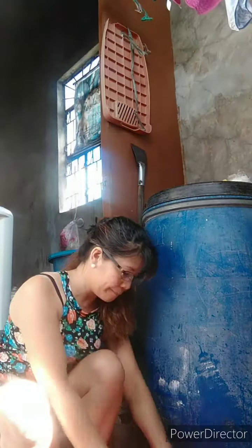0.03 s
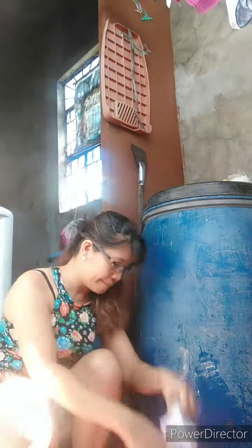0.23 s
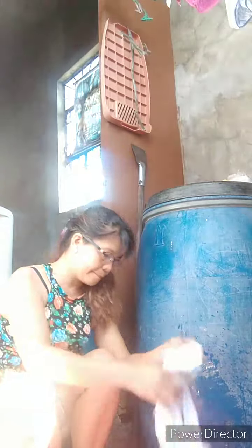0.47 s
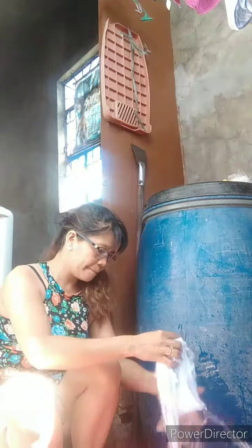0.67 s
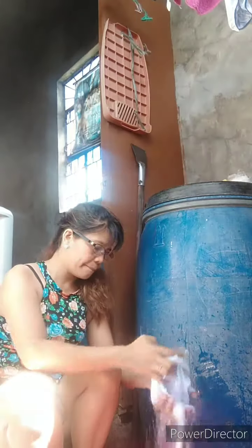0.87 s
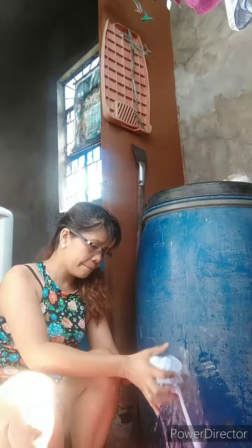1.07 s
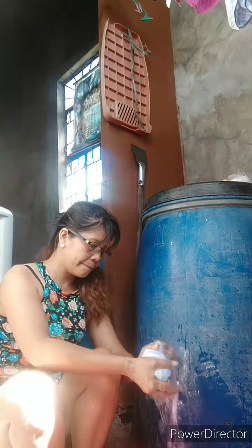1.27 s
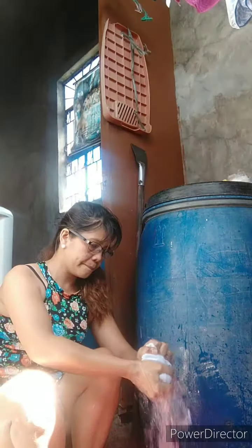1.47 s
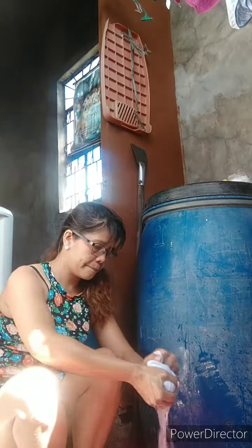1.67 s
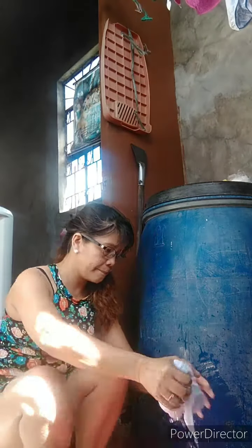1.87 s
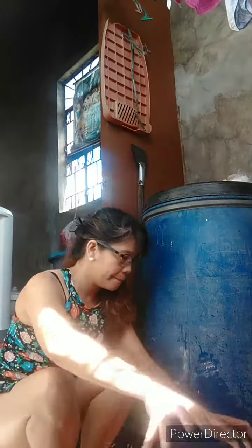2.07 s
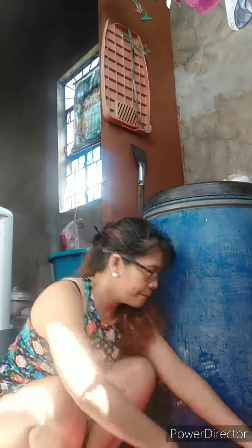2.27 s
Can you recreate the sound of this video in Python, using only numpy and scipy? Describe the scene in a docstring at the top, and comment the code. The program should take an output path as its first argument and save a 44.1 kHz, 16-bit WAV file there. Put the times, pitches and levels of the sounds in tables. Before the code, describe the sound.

Splashing water runs off a wet cloth, heard up close in a small washroom. After a soft bump on the basin, two squeezes send down fine spray with plinking drips and gurgles, then another bump comes and the water dies away.

```python
"""Water patters off a soaked cloth, lifted from a plastic basin, wrung twice and dropped back.
The run-off falls as fine spray and drives bubbles of every size into the water; drops plink and tick,
the water gurgles, the grip presses out squirts. Faint metallic rings come at the start and end.
The basin hums under the dragging cloth and thuds when bumped.
Small concrete wash room; one close microphone on both channels."""
import sys
import numpy as np
from scipy import signal
from scipy.fft import rfft, irfft, next_fast_len
from scipy.io import wavfile
from scipy.ndimage import map_coordinates

SR = 44100
rng = np.random.default_rng(int(sys.argv[2]) if len(sys.argv) > 2 else 0)


def put_to_file(sound):
    """Save the sound as 16-bit audio at rate SR, in the file named by the first command-line argument."""
    columns = np.atleast_2d(sound).T  # one column per channel
    safe = np.clip(columns, -1, 1)
    whole_steps = np.round(safe * 32767)
    wavfile.write(sys.argv[1], SR, whole_steps.astype(np.int16))


N = 101429

# falling water through lift, first squeeze, trickle, second squeeze, drop
# (time [s], spray gain [dB], fizz gain [dB], larger-bubble gain [dB])
WATER_FLOW = [(0, -40.5, -44, -47.5), (.07, -52.5, -59, -69), (.17, -49, -79, -75.5),
              (.28, -46.5, -57, -53), (.32, -42.5, -47, -43), (.41, -44.5, -41.5, -43),
              (.5, -39, -42.5, -39.5), (.61, -42, -42.5, -42), (.7, -45.5, -49, -53.5),
              (.74, -32, -31.5, -32.5), (.795, -41.5, -56, -44), (.815, -34.5, -31, -40.5),
              (.87, -35, -40, -40.5), (.91, -32, -34, -34.5), (.99, -32.5, -34, -36),
              (1.04, -34.5, -36.5, -54.5), (1.09, -33.5, -42, -35), (1.12, -29.5, -32, -43.5),
              (1.15, -42, -42.5, -47), (1.23, -36.5, -36.5, -42.5), (1.33, -40, -38, -44.5),
              (1.39, -35, -38, -43), (1.54, -42, -41, -44), (1.59, -39, -45, -40), (1.67, -37, -38, -44),
              (1.705, -29, -33, -32.5), (1.765, -34, -38, -37), (1.83, -29.5, -34, -40),
              (1.89, -39.5, -42, -35.5), (1.97, -37.5, -40, -43.5), (2.06, -44.5, -49.5, -50.5),
              (2.155, -55, -57.5, -54.5), (2.21, -54, -55, -103), (2.3, -72, -71, -106)]
# deep churning where the stream enters the basin (time [s], level [dB])
CHURN_LEVEL = [(.4, -85), (.54, -63), (.7, -77), (.75, -53.5), (.84, -54.5), (.91, -42.5), (1.12, -56.5),
               (1.22, -93), (1.37, -50), (1.53, -60.5), (1.77, -49.5), (2.12, -53.5), (2.24, -89)]
# cloth dragging on the basin (time [s], length [s], level [dB])
CLOTH_DRAGS = [(0.031, 0.17, -59), (0.223, 0.11, -59), (0.434, 0.14, -58.5), (.62, 0.075, -63.5)]
# four faint metallic rings, then bubble plinks (time [s], peak [dB], start pitch [Hz], life [cycles])
RINGS_AND_PLINKS = [(0.055, -43, 2650, 180), (.068, -48, 2000, 350), (0.144, -44, 3920, 210),
                    (.172, -54, 2060, 550), (1.226, -27.5, 1610, 32), (1.066, -25.5, 2366, 110),
                    (1.1614, -19.5, 2217, 71), (1.29, -29.5, 1920, 83), (1.448, -19.5, 3560, 49),
                    (1.474, -16, 2970, 30), (1.8183, -22.5, 2640, 79), (1.857, -24, 1360, 47),
                    (1.952, -26.5, 1680, 55)]
# knocks on the basin (time [s], gain [dB], relative slap level [dB])
BASIN_BUMPS = [(0.192, -39, 0.5), (0.805, -57, -6), (1.979, -39.5, -9)]
# basin resonances (frequency [Hz], relative level [dB], T60 [s])
BASIN_MODES = [(246, 6.5, 0.088), (287, 5.5, 0.047)]
# drops bursting on the water (time [s], ping peak [dB], start pitch [Hz])
DROP_TICKS = [(0.2251, -27, 7500), (0.462, -23, 8130), (0.5404, -18, 8370), (1.1792, -12, 7830),
              (1.194, -14.5, 7300), (1.4204, -22, 7140), (1.4753, -25, 5570), (1.6114, -22, 6640),
              (1.7166, -20, 7450), (1.925, -16, 7930), (1.941, -21.5, 7600)]
# gurgles, slurps, a wet slap at 0.718 s, a faint metallic ring at 2.12 s
# (time [s], length [s], start [Hz], end [Hz], width [Hz], level [dB])
WAVERING_BANDS = [(0.281, 0.057, 878, 1653, 255, -41), (0.478, 0.03, 510, 544, 29.3, -35.5),
                  (.55, 0.08, 1189, 1120, 64, -46), (0.718, 0.043, 2015, 1387, 1120, -33.5),
                  (0.732, 0.053, 517, 512, 45, -43.5), (0.946, 0.079, 473, 452, 110, -51),
                  (1.007, 0.15, 341.4, 388, 58, -50), (1.27, 0.19, 473, 443, 63, -52.5),
                  (1.542, 0.13, 404.6, 392, 45, -53.5), (1.695, 0.074, 530, 530, 35.3, -53),
                  (1.742, 0.22, 403.6, 373.7, 108, -53), (2.12, .2, 1160, 1168, 128, -71.5)]
# squirts from the cloth (time [s], length [s], level [dB])
CLOTH_SQUIRTS = [(0.561, 0.012, -28), (1.315, 0.029, -33), (1.466, .03, -34), (1.532, 0.028, -34),
                 (1.813, .025, -38), (2.173, .025, -48)]
# room decay (frequency [Hz], T60 [s])
ROOM_T60 = [(150, 0.31), (1000, 0.23), (4000, 0.3), (8000, 0.16), (15000, 0.21)]
# spectral shape of each source (frequency [Hz], relative gain [dB])
SPRAY_EQ = [(700, -58), (2000, -19), (3000, -10.5), (4000, -13.5), (5000, -7.5), (6500, -3), (7750, 1.5),
            (8800, -6), (10500, -11.5), (13000, -22), (15700, -27)]
FIZZ_EQ = [(800, -43), (1800, -8), (2500, -9), (3300, 0), (4000, -2.5), (4700, -8.5), (7000, -10)]
BUBBLE_EQ = [(400, -29), (600, -9.5), (950, -5.5), (1400, -3), (2250, -2), (2900, -11), (4500, -37)]
CHURN_EQ = [(200, -16), (300, -16.5), (380, -3), (530, 1.5), (650, -3.5), (1000, -65)]
HUM_EQ = [(25, -26), (62, 8.5), (92, -6), (120, 13.5), (150, 0), (400, -28)]
SLAP_EQ = [(150, -24), (300, -7.5), (500, 6.5), (850, 6), (1250, 4.5), (1700, -29), (2300, 4), (3500, 0.5),
           (9000, -50)]
SPLAT_EQ = [(700, -47), (3000, -6), (5500, -1.5), (7750, 8), (10000, -3), (14000, -28)]
BACKGROUND_EQ = [(70, 0), (200, 2), (1500, -25), (8000, -10.5), (15000, -21.5)]


def amp(db):
    """Decibels to gain."""
    return 10 ** (np.asarray(db) / 20)


def unit_rms(x):
    """Scale to rms 1."""
    return x / np.sqrt(np.mean(x ** 2) + 1e-20)


def log_interp(points, hz):
    """Read (frequency [Hz], value) points on a log axis."""
    knots_hz, values = np.transpose(points)
    return np.interp(np.log(hz + 1), np.log(knots_hz + 1), values)


def curves(rows):
    """Per-sample curve for each column after the time."""
    times_s, *columns = np.transpose(rows)
    return [np.interp(np.arange(N) / SR, times_s, column) for column in columns]


def wobble(rate_hz, n=N, knots=1000):
    """Smooth random curve, rate_hz knots a second."""
    return map_coordinates(rng.standard_normal(knots), [np.arange(n) * rate_hz / SR], mode="wrap")


def filtered(x, response):
    """Apply a gain given as a function of frequency."""
    size = next_fast_len(N + SR // 2)
    return irfft(rfft(x, size) * response(np.fft.rfftfreq(size, 1 / SR)), size)[:N]


def shaped(x, eq):
    """Equalise, then scale to rms 1."""
    return unit_rms(filtered(x, lambda hz: amp(log_interp(eq, hz))))


def noise(eq, n=N):
    """n samples of shaped noise."""
    return shaped(rng.standard_normal(N), eq)[:n]


def add(track, start_s, sound):
    """Mix a sound into the track."""
    part = track[max(round(start_s * SR), 0):][:len(sound)]
    part += sound[:len(part)]


def chirp(t, hz, cycles, rise, attack_s):
    """Damped tone, climbing like a bubble nearing the surface; 60 dB down after its cycles."""
    age = t * hz / cycles
    tone = np.sin(2 * np.pi * hz * t * (1 + rise * age / 2))
    return tone * amp(-60 * age) * (1 - np.exp(-t / attack_s)) ** 2


def swarm(low_hz, high_hz, cycles, rise, spread_db, count):
    """Bubbles of random time, pitch, strength and life; about equal power per Hz."""
    when, pitch, strength, life = rng.random((count, 4)).T[:, :, None]
    hz = low_hz * (high_hz / low_hz) ** pitch
    t = np.arange(int(SR * min(cycles / low_hz, .15))) / SR
    gain = hz * amp(spread_db * strength ** 3)
    rings = gain * chirp(t, hz, cycles * (.5 + life), rise, attack_s=.5 / hz)
    samples = (when * N).astype(int) + np.arange(len(t))
    return np.bincount(samples.ravel(), rings.ravel(), N)[:N]


def run_off(patter_db=-4, mist_db=-2.5, spurt_db=1.3):
    """Falling water: droplets and mist, small and large bubbles under them, deep churning."""
    spray_db, fizz_db, bubbles_db = curves(WATER_FLOW)
    churn_db, = curves(CHURN_LEVEL)
    mist = noise(SPRAY_EQ)
    patter = shaped(swarm(1840, 14670, cycles=12, rise=.18, spread_db=8, count=4200), SPRAY_EQ)
    fizz = shaped(swarm(1920, 5700, cycles=41, rise=.068, spread_db=3, count=1400), FIZZ_EQ)
    bubbles = shaped(swarm(516, 3308, cycles=39.6, rise=.054, spread_db=7, count=1500), BUBBLE_EQ)
    churn = shaped(swarm(251.4, 808, cycles=36, rise=.28, spread_db=-5.5, count=900), CHURN_EQ)
    spray = amp(spray_db) * (amp(patter_db) * patter + amp(mist_db) * mist)
    splash = spray + amp(fizz_db) * fizz + amp(bubbles_db) * bubbles
    spurts = amp(spurt_db * wobble(rate_hz=110))
    return spurts * splash + amp(churn_db) * churn


def drags():
    """The basin hums dully while the cloth drags on it."""
    out = np.zeros(N)
    for start_s, length_s, db in CLOTH_DRAGS:
        stroke = np.sqrt(np.abs(np.hanning(round(length_s * SR))))
        add(out, start_s, amp(db) * stroke * noise(HUM_EQ, len(stroke)))
    return out


def rings_and_plinks():
    """Faint metallic ringing at the start, then short bubble plinks."""
    out, t = np.zeros(N), np.arange(SR // 4) / SR
    for start_s, db, hz, cycles in RINGS_AND_PLINKS:
        ring = chirp(t, hz, cycles, rise=.064, attack_s=.000092)
        add(out, start_s, amp(db) * ring / np.abs(ring).max())
    return out


def bumps(attack_s=.006, slap_t60_s=.27):
    """The bumped basin thuds in its modes under a wet slap."""
    out, t = np.zeros(N), np.arange(SR // 3) / SR
    thud = sum(amp(db - 60 * t / t60_s) * np.sin(2 * np.pi * hz * t) for hz, db, t60_s in BASIN_MODES)
    attack = 1 - np.exp(-t / attack_s)
    for start_s, db, slap_db in BASIN_BUMPS:
        slap = noise(SLAP_EQ, len(t)) * amp(slap_db - 60 * t / slap_t60_s)
        add(out, start_s, amp(db) * (thud + slap) * attack)
    return out


def ticks(splat_gain=.45, splat_decay_s=.0037):
    """Drops burst on the water: a sharp ping and a tiny splat."""
    out, t = np.zeros(N), np.arange(SR // 4) / SR
    for start_s, db, hz in DROP_TICKS:
        ping = chirp(t, hz, cycles=74, rise=.055, attack_s=.0002)
        splat = noise(SPLAT_EQ, len(t)) * np.exp(-t / splat_decay_s)
        add(out, start_s, amp(db) * (ping / np.abs(ping).max() + splat_gain * splat))
    return out


def wavering_bands(attack_s=.011, release_s=.026):
    """Noise bands around gliding tones: gurgles, slurps, a wet slap and a faint closing ring."""
    out = np.zeros(N)
    for start_s, length_s, start_hz, end_hz, width_hz, db in WAVERING_BANDS:
        n = round(length_s * SR)
        t = np.arange(n) / SR
        phase = 2 * np.pi * np.cumsum(np.linspace(start_hz, end_hz, n)) / SR
        in_phase = 1 + wobble(width_hz, n, knots=64)
        quadrature = wobble(width_hz, n, knots=64)
        band = unit_rms(in_phase * np.sin(phase) + quadrature * np.cos(phase))
        envelope = np.clip(np.minimum(t / attack_s, (length_s - t) / release_s), 0, 1)
        add(out, start_s, amp(db) * envelope * band)
    return out


def squirts(attack_s=.0023):
    """Each tightening of the grip shoots out a brief crackle of tiny droplets."""
    crackle = shaped(swarm(3300, 14200, cycles=10.4, rise=0, spread_db=15, count=5000), SPRAY_EQ)
    pressure = np.zeros(N)
    for start_s, length_s, db in CLOTH_SQUIRTS:
        t = np.arange(round(length_s * SR)) / SR
        fade = np.sqrt(np.abs(1 - t / length_s))
        add(pressure, start_s, amp(db) * np.minimum(t / attack_s, 1) * fade)
    return pressure * crackle


def room(x, wet_db=-3.5, wall_delay_s=.003, tail_count=46):
    """Bare walls answer at once, a little differently as the splash moves; the treble around 8 kHz dies first."""
    hz, t, spectra = signal.stft(rng.standard_normal((tail_count, SR // 3)), SR, nperseg=256)
    decay = amp(-60 * t / log_interp(ROOM_T60, hz)[:, None])
    _, tails = signal.istft(spectra * decay, SR, nperseg=256)
    wet, hop = np.zeros(N), N // tail_count + 1
    window = signal.windows.cosine(2 * hop)
    for k, tail in enumerate(tails):
        piece = x[k * hop:][:2 * hop]
        reflections = signal.fftconvolve(piece * window[:len(piece)], tail / np.linalg.norm(tail))
        add(wet, k * hop / SR + wall_delay_s, reflections)
    return (x + amp(wet_db) * wet) / np.hypot(1, amp(wet_db))


def scene(background_db=-71.5):
    """Water and basin in the room, over faint background noise."""
    background = amp(background_db) * noise(BACKGROUND_EQ)
    direct = run_off() + squirts() + wavering_bands() + ticks() + rings_and_plinks() + bumps() + drags()
    mono = room(direct) + background
    return np.array([mono, mono])


def record(dry, cutoff_hz=15750):
    """Brick-wall low-pass on each channel."""
    return np.array([filtered(channel, lambda hz: hz < cutoff_hz) for channel in dry])


dry = scene()
out = record(dry)
put_to_file(out)
```